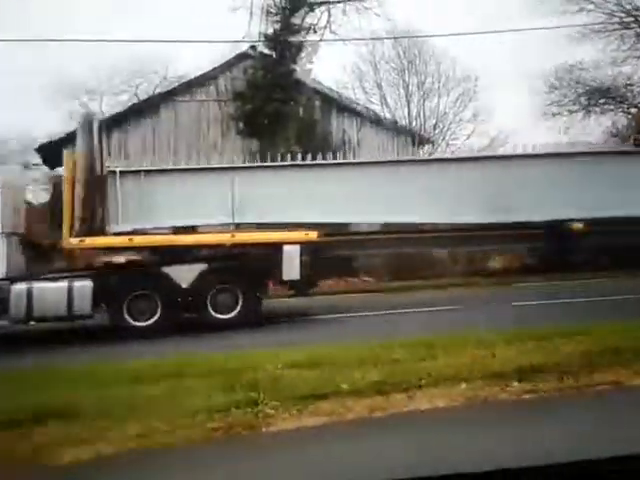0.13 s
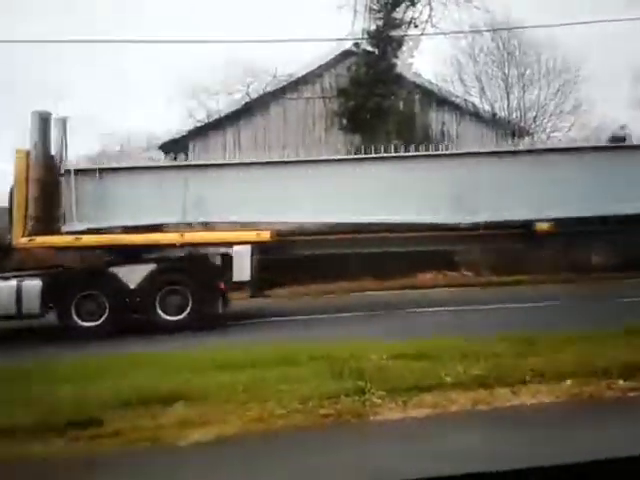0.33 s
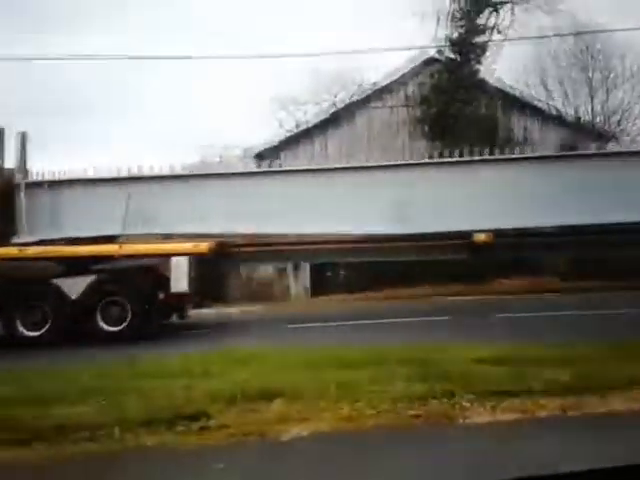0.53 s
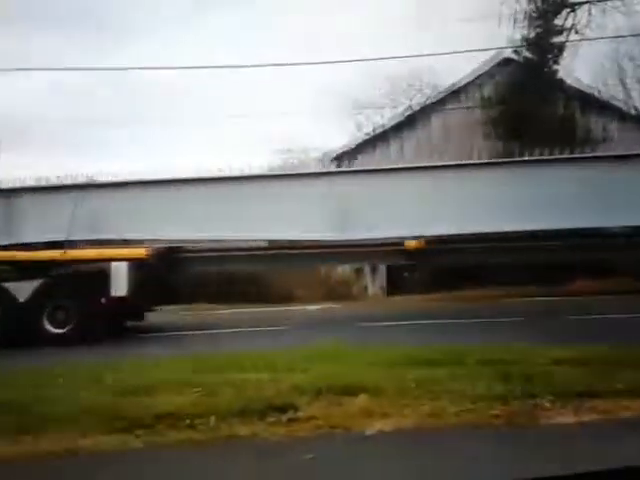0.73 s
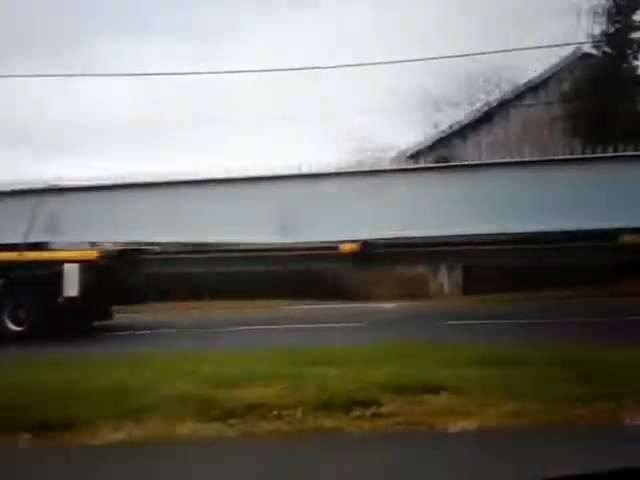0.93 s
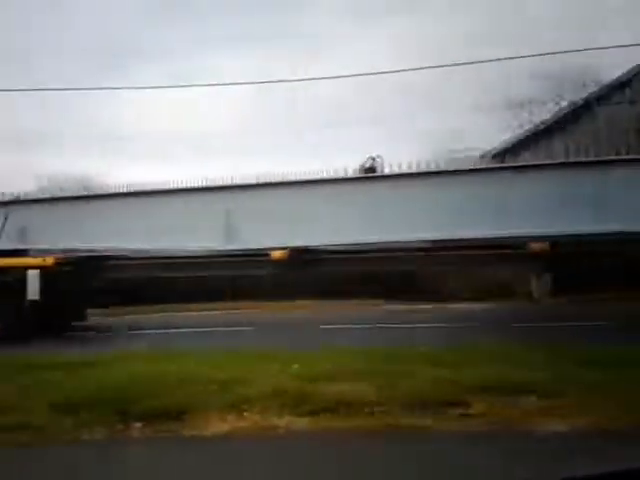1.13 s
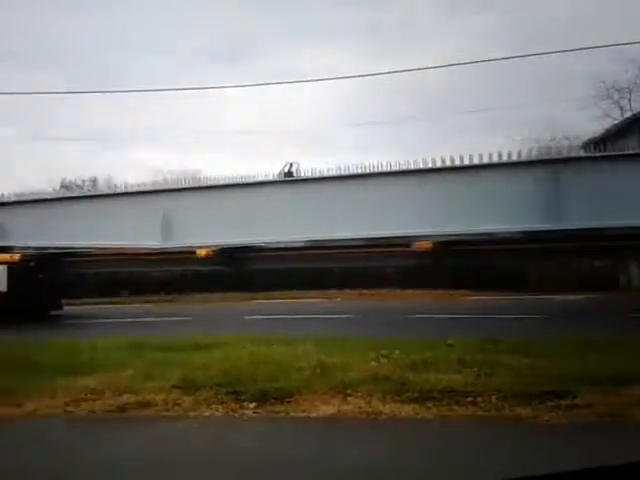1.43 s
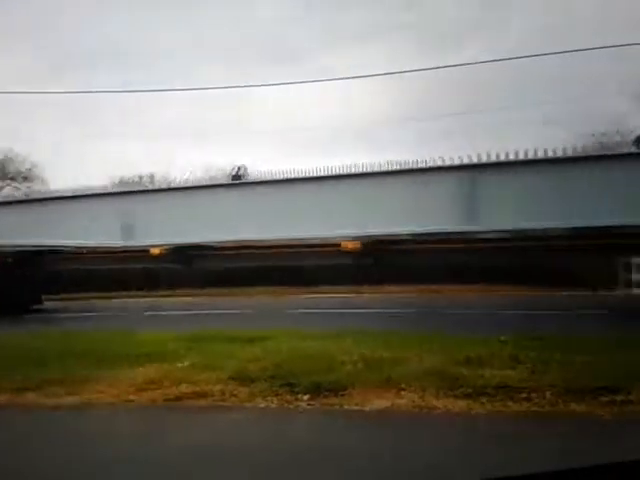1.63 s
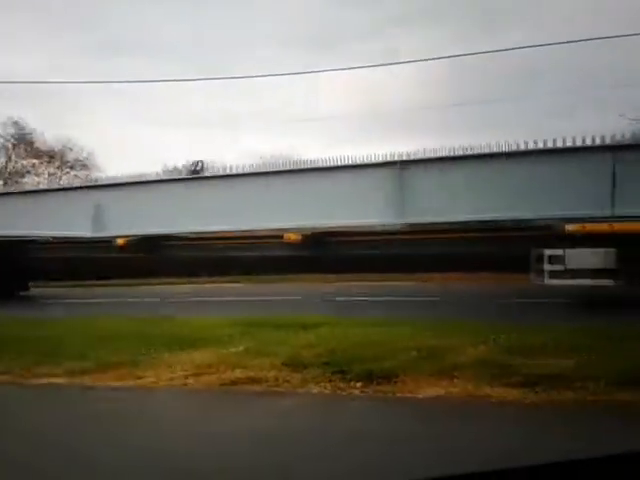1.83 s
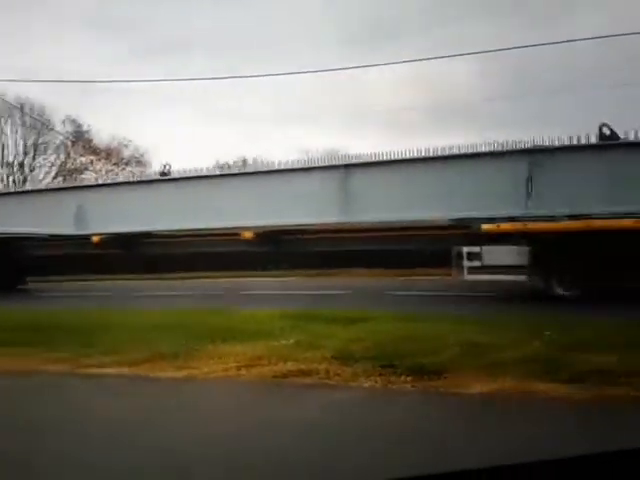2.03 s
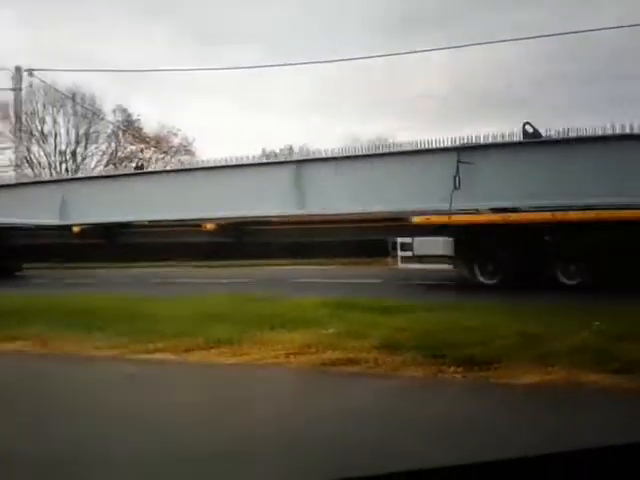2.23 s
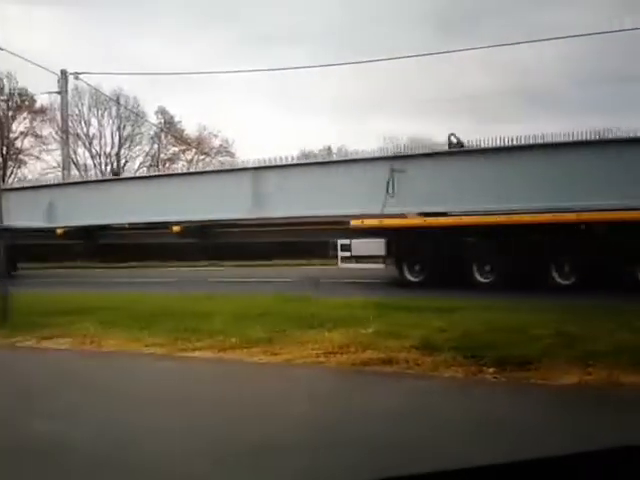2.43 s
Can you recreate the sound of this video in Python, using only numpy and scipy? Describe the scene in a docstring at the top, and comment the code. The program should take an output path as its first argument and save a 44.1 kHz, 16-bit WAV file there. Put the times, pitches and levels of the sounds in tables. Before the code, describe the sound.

Dull, droning pass of a long heavy truck, with wet tyre hiss, heard from a waiting car

```python
"""On a wet road, heard dully from a waiting car, a heavy truck with a long trailer passes.
Its exhaust drones as fluttering harmonics of the firing rate, uneven at first, then swelling on the
octave once the cab has gone by. The tyres roar, hiss and spray as shaped noise over a low rumble, and
their tread sings as one fluttering partial on a note that falls overall.
Over it lie a faint whine of steady-pitched partials, noise hiss and one decaying click."""
import sys
import numpy as np
from scipy import signal
from scipy.fft import rfft, irfft, next_fast_len
from scipy.io import wavfile
from scipy.ndimage import map_coordinates

SR = 44100
rng = np.random.default_rng(int(sys.argv[2]) if len(sys.argv) > 2 else 0)


def file_out(sig):
    """Save sig as 16-bit WAV at sys.argv[1]."""
    # one column per channel
    cols = np.atleast_2d(sig).T
    # limit, then scale
    lim = np.clip(cols, -1, 1)
    pcm = np.round(lim * 32767).astype(np.int16)
    wavfile.write(sys.argv[1], SR, pcm)


N = 113337  # samples

# Exhaust firing rate: (time [s], rate [Hz])
FIRING_RATE = [(0, 142), (.22, 138.3), (.36, 141.5), (.62, 141.8), (.9, 139.1), (1.15, 138.1), (1.5, 137.7),
               (1.95, 137.8), (2.3, 137.4), (2.57, 138.3)]
# Firing note: (time [s], level [dB])
BOOM_LEVEL = [(0, -53), (.14, -51), (.3, -46.5), (.41, -51), (.5, -46), (.62, -50.5), (.84, -50),
              (.98, -55), (1.04, -67), (1.1, -52), (1.3, -54), (1.55, -56.5), (1.75, -55.5), (1.86, -59.5),
              (2.3, -59), (2.57, -57)]
# Octave of the firing note: (time [s], level [dB])
DRONE_LEVEL = [(0.0, -58), (0.05, -51.5), (0.07, -68), (0.09, -50.5), (0.22, -47.5), (0.3, -72),
               (0.33, -48), (0.39, -44), (0.43, -48), (0.49, -42.5), (0.53, -58.5), (0.56, -46.5),
               (0.75, -70.5), (0.83, -43.5), (0.87, -66), (0.9, -45.5), (0.99, -47), (1.03, -63),
               (1.07, -45), (1.09, -56.5), (1.23, -46.5), (1.27, -59), (1.3, -49), (1.36, -42.5),
               (1.77, -41), (1.8, -47.5), (1.84, -40.5), (1.92, -44), (1.97, -51), (2.0, -46.5),
               (2.17, -39), (2.51, -45), (2.54, -66), (2.57, -45)]
# Rough second octave: (time [s], level [dB])
GROWL_LEVEL = [(0, -62), (.15, -58.5), (.3, -56), (.4, -56), (.5, -57.5), (.75, -58), (.82, -68),
               (1.0, -64), (1.1, -61.5), (1.36, -55.5), (1.43, -72), (1.55, -59.5), (1.9, -62), (2.1, -64),
               (2.57, -68.5)]
# Weaker engine orders: (multiple of the crank speed [1], level at the start [dB])
CRANK_ORDERS = [(2.45, -65), (3.95, -62.5), (4.95, -59), (7, -67.5), (10.55, -62.5), (15.1, -70),
                (17, -68.5)]
FIRINGS_PER_TURN = 3
ORDERS_FADE_DB_PER_S = 3.5
BEAT_HZ, BEAT_DEPTH, BEAT_DIP_S = 8.15, 0.7, 0.18  # the beat is weakest at the dip time
BOOM_SHARP_HZ, GROWL_SHARP_HZ = 4.5, 9  # height above the exact multiples of the firing rate

# Low rumble spectrum: (frequency [Hz], relative level [dB per Hz])
RUMBLE_SPECTRUM = [(20, -31), (45, -33), (70, -16.5), (95, -17), (115, -2.5), (145, -4), (175, -5),
                   (200, -13), (228, -0.5), (255, -3.5), (285, -2.5), (320, -9), (370, -15.5), (450, -25),
                   (800, -73)]
RUMBLE_START_DB, RUMBLE_FADE_DB_PER_S = -52, 0.87

# Tread note pitch: (time [s], frequency [Hz])
TREAD_PITCH = [(0, 403.9), (.8, 408.4), (1.3, 403.3), (1.8, 403.3), (2.05, 401.5), (2.3, 393.4),
               (2.57, 393.4)]
# Tread note: (time [s], level [dB])
TREAD_LEVEL = [(0, -64.5), (.14, -59.5), (.25, -61.5), (.32, -65), (.5, -70), (.56, -56.5), (.62, -53),
               (.67, -65), (.73, -57.5), (1.05, -58.5), (1.09, -63), (1.14, -53), (1.3, -54.5), (1.38, -58),
               (1.53, -52), (1.59, -69.5), (1.7, -70), (1.78, -53.5), (1.88, -47), (2.02, -42.5),
               (2.12, -47.5), (2.3, -51), (2.57, -47.5)]

# Road noise: (time [s], roar level [dB], wet tyre hiss level [dB], spray level [dB])
ROAD_LEVELS = [(0, -52, -61, -82), (.3, -53, -62, -82), (.7, -52.5, -61.5, -82), (1.05, -54.5, -60.5, -82),
               (1.35, -55.5, -63, -80), (1.6, -57.5, -62, -81), (1.9, -54.5, -63, -81.5),
               (2.2, -55, -64.5, -83), (2.57, -56, -65.5, -85)]
# Tyre roar spectrum: (frequency [Hz], relative level [dB per Hz])
ROAR_SPECTRUM = [(250, -39), (370, -15), (425, -7), (475, 0.5), (525, -6.5), (575, -1), (630, -8),
                 (680, -4.5), (730, -13.5), (790, -8.5), (920, -15), (1200, -23), (2500, -77)]
# Wet tyre hiss spectrum: (frequency [Hz], relative level [dB per Hz])
WET_SPECTRUM = [(400, -27.5), (800, -3), (1050, 0.5), (1300, -2.5), (1650, -1.5), (2050, -4), (2300, -6.5),
                (2650, -8), (2950, -27), (3500, -44), (6000, -81)]
# Spectrum of water sizzling under the trailer: (frequency [Hz], relative level [dB per Hz])
SIZZLE_SPECTRUM = [(600, -60), (1250, -25.5), (1520, -1), (1630, -1), (1800, -7.5), (1950, -10.5),
                   (2030, -2), (2130, -15), (2450, -9), (2900, -42), (5000, -78)]
# Fine spray spectrum: (frequency [Hz], relative level [dB per Hz])
SPRAY_SPECTRUM = [(1500, -23.5), (2900, 1.5), (3700, 0), (4600, -4.5), (5500, -8.5), (6500, -13),
                  (8000, -27), (12000, -63)]
SIZZLE_PEAK_DB, SIZZLE_PEAK_S, SIZZLE_HALF_WIDTH_S = -66.5, 1.49, 0.5  # gain halves at the half width
# Nearby hard surfaces returning wet tyre noise: (delay [s], gain [1])
REFLECTIONS = [(0.011, 0.29), (0.0159, -.2), (.02, 0.31), (.031, 0.059), (.038, -.15)]

# Electronic whine: (frequency [Hz], level [dB])
WHINE_PARTIALS = [(5163, -101), (5669, -99), (6171.7, -89), (6298, -96.5), (6675, -107), (7734, -102),
                  (7796, -106), (11967, -105), (12345, -101), (12471, -93), (15525, -106)]
# Steady hiss spectrum: (frequency [Hz], relative level [dB per Hz])
HISS_SPECTRUM = [(20, 17), (120, 9), (3000, -1.5), (8000, -1.5), (15000, -0.5)]
HISS_DB = -88  # before the band limit
CLICK_S, CLICK_PEAK_DB, CLICK_DECAY_S, CLICK_RING_HZ = 1.4233, -34.5, 0.0024, 190
BAND_LIMIT_HZ = 15750


def amp(db):
    """Level to amplitude ratio: 20 dB is a factor of ten."""
    return 10 ** (np.asarray(db) / 20)


def unit(x):
    """Normalisation to an rms amplitude of 1."""
    return x / np.sqrt(np.mean(x ** 2) + 1e-20)


def clock():
    """Uniform sampling: the time of each sample in seconds."""
    return np.arange(N) / SR


def curves(rows):
    """Linear interpolation in time of each column after the first."""
    times, *columns = np.transpose(rows)
    return [np.interp(clock(), times, column) for column in columns]


def wobble(rate):
    """Random modulation: a smooth curve of rms 1 through rate random knots a second."""
    knots = rng.standard_normal(2000)
    return unit(map_coordinates(knots, [clock() * rate + 2], mode="wrap"))


def filtered(x, response):
    """Linear filtering: the spectrum is multiplied by a response of frequency."""
    size = next_fast_len(N + 8192)
    frequencies = np.fft.rfftfreq(size, 1 / SR)
    return irfft(rfft(x, size) * response(frequencies), size)[..., :N]


def rush(spectrum, side_db):
    """Shaped stereo noise of rms 1: a shared mid signal plus a side signal of opposite signs."""
    table_hz, table_db = np.transpose(spectrum)

    def response(hz):
        return amp(np.interp(np.log(hz + 1), np.log(table_hz), table_db))

    mid, side = filtered(rng.standard_normal((2, N)), response)
    side = amp(side_db) * side
    return unit(np.array([mid + side, mid - side]))


def tone(hz, rough, flutter_rate):
    """Complex modulation: a partial of rms 1 whose strength and phase flutter."""
    flutter = 1 + rough * (wobble(flutter_rate) + 1j * wobble(flutter_rate))
    cycles = np.cumsum(hz) / SR + rng.random()
    return unit(np.real(flutter * np.exp(2j * np.pi * cycles)))


def engine():
    """Periodic firing excites a beating note, two octaves and crank orders that fade as the cab leaves."""
    firing, = curves(FIRING_RATE)
    boom_level, = curves(BOOM_LEVEL)
    drone_level, = curves(DRONE_LEVEL)
    growl_level, = curves(GROWL_LEVEL)

    # A weaker copy of the note BEAT_HZ below it interferes to make the beats.
    beat = 1 - BEAT_DEPTH * np.exp(-2j * np.pi * BEAT_HZ * (clock() - BEAT_DIP_S))
    firing_note = tone(firing + BOOM_SHARP_HZ, rough=0.079, flutter_rate=25)
    boom = amp(boom_level) * unit(np.real(beat * signal.hilbert(firing_note)))
    drone = amp(drone_level + 0.1) * tone(2 * firing, rough=0.08, flutter_rate=23)
    growl = amp(growl_level) * tone(4 * firing + GROWL_SHARP_HZ, rough=0.3, flutter_rate=40)

    crank = firing / FIRINGS_PER_TURN
    orders = sum(amp(db) * tone(multiple * crank, rough=0.68, flutter_rate=18)
                 for multiple, db in CRANK_ORDERS)
    fade = amp(-ORDERS_FADE_DB_PER_S * clock())
    return boom + drone + growl + orders * fade


def rumble():
    """Broadband vibration of engine and running gear: low shaped noise that wavers as it fades."""
    level = RUMBLE_START_DB - RUMBLE_FADE_DB_PER_S * clock() + 0.48 * wobble(9)
    return amp(level) * rush(RUMBLE_SPECTRUM, side_db=-50)


def tread():
    """Tonal excitation by tread blocks: one partial sinking in pitch as the wheels draw level."""
    pitch, = curves(TREAD_PITCH)
    level, = curves(TREAD_LEVEL)
    return amp(level) * tone(pitch, rough=0.13, flutter_rate=60)


def reflected(x):
    """Superposition of the direct sound and early reflections, scaled by their summed power."""
    delays, gains = np.transpose(REFLECTIONS)

    def response(hz):
        return 1 + gains @ np.exp(-2j * np.pi * np.outer(delays, hz))

    return filtered(x, response) / np.sqrt(1 + np.sum(gains ** 2))


def tyres():
    """Random excitation by a wet road: noise bands for roar, hiss, sizzle and fine spray."""
    roar_db, wet_db, spray_db = curves(ROAD_LEVELS)

    roar_level = roar_db - 0.72 + 0.56 * wobble(14) + 0.74 * wobble(130)
    roar = amp(roar_level) * rush(ROAR_SPECTRUM, side_db=-38.5)

    wet_level = wet_db - 0.1 + 0.2 * wobble(12) + 0.19 * wobble(170)
    wet = amp(wet_level) * rush(WET_SPECTRUM, side_db=-19.5)

    # The sizzle swells once.
    swell = 1 / (1 + ((clock() - SIZZLE_PEAK_S) / SIZZLE_HALF_WIDTH_S) ** 2)
    sizzle = amp(SIZZLE_PEAK_DB) * swell * rush(SIZZLE_SPECTRUM, side_db=-21.5)

    spray_level = spray_db + 1.04 + 0.18 * wobble(17)
    spray = amp(spray_level) * rush(SPRAY_SPECTRUM, side_db=-12)
    return roar + reflected(wet + sizzle) + spray


def whine_hiss_and_click():
    """Additive synthesis: fluttering whine, random hiss and a click made as one damped oscillation."""
    whine = sum(amp(db) * tone(np.full(N, hz), rough=0.3, flutter_rate=110)
                for hz, db in WHINE_PARTIALS)
    hiss = amp(HISS_DB) * rush(HISS_SPECTRUM, side_db=-3.5)

    age = clock() - CLICK_S
    decay = (age >= 0) * np.exp(-np.abs(age) / CLICK_DECAY_S)
    click = amp(CLICK_PEAK_DB) * decay * np.cos(2 * np.pi * CLICK_RING_HZ * age)
    return whine + hiss + click


def scene():
    """Superposition of the truck's sounds, whine, hiss and click."""
    return engine() + rumble() + tread() + tyres() + whine_hiss_and_click()


def record(dry):
    """Band limitation: the recorder keeps only frequencies below its limit."""
    return filtered(dry, lambda hz: hz < BAND_LIMIT_HZ)


dry = scene()
out = record(dry)
file_out(out)
```